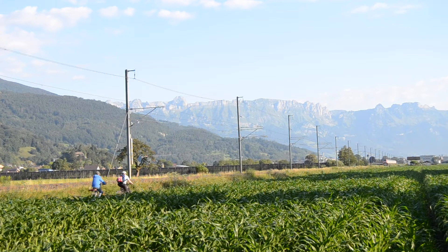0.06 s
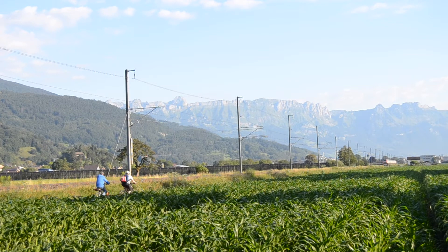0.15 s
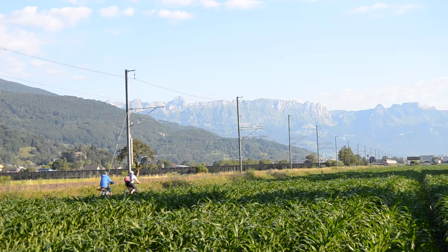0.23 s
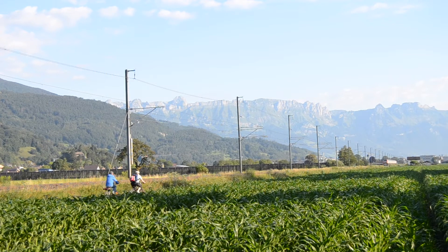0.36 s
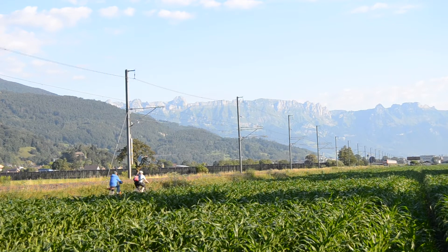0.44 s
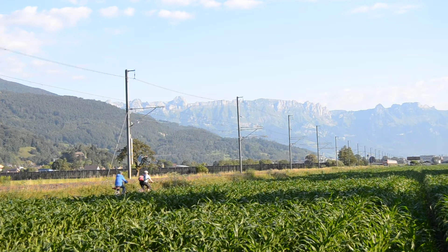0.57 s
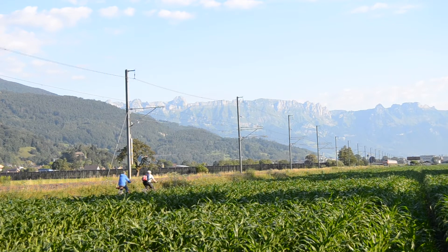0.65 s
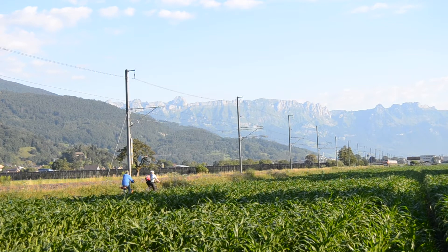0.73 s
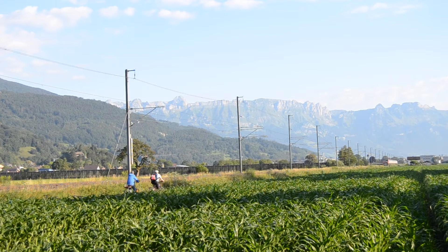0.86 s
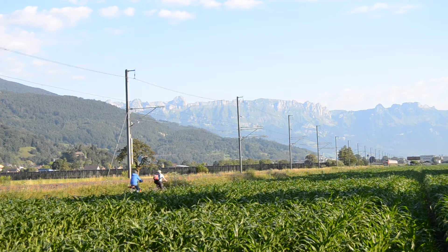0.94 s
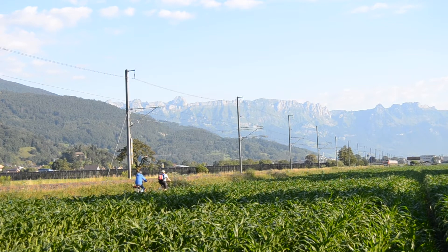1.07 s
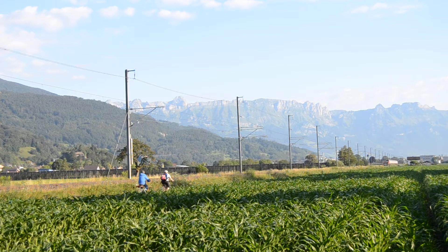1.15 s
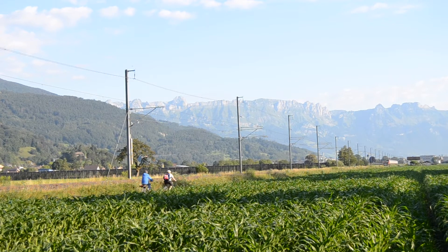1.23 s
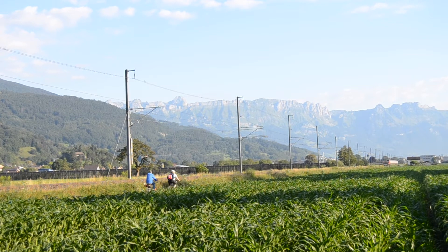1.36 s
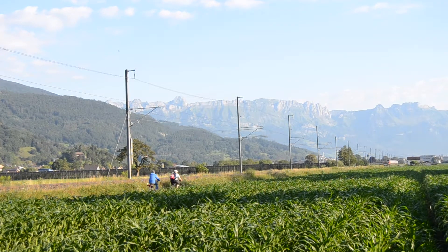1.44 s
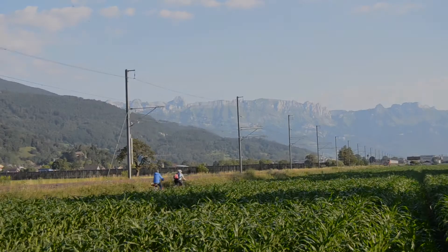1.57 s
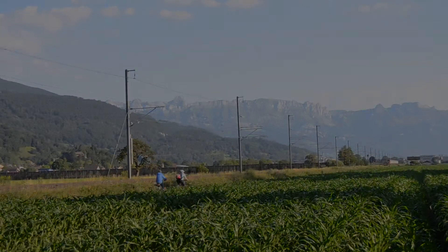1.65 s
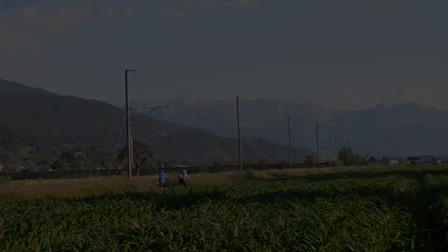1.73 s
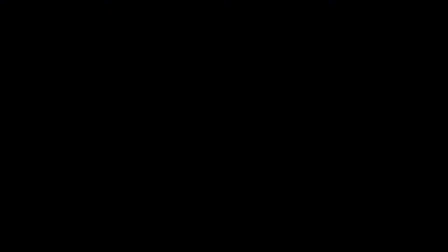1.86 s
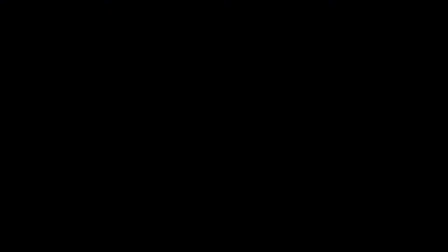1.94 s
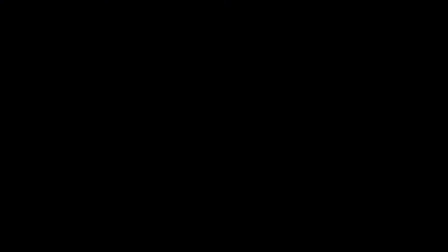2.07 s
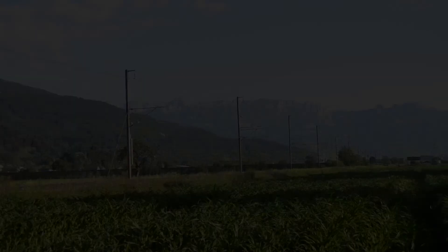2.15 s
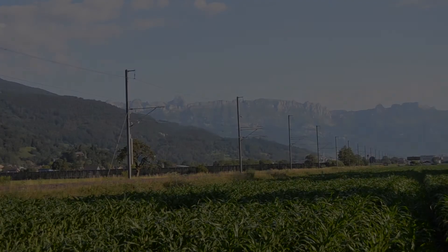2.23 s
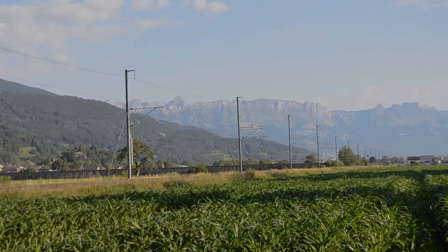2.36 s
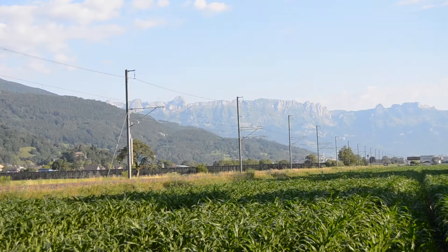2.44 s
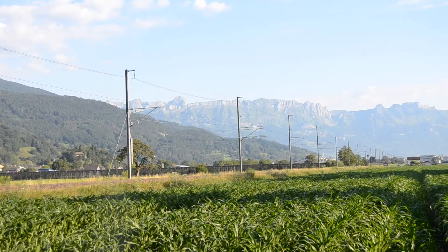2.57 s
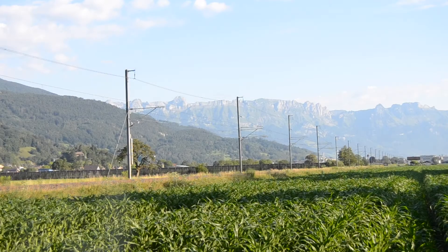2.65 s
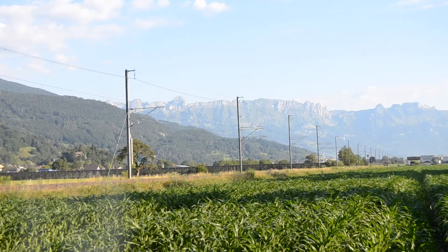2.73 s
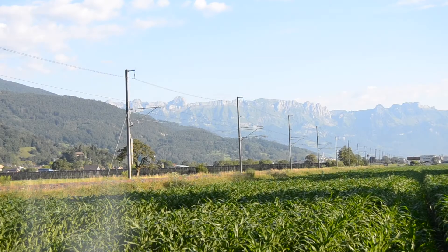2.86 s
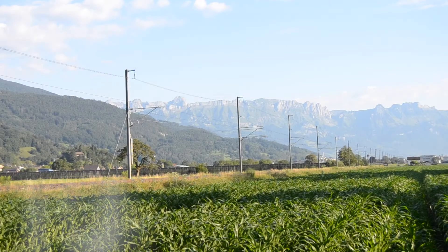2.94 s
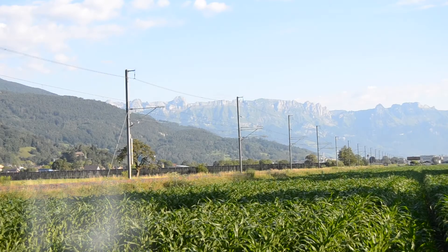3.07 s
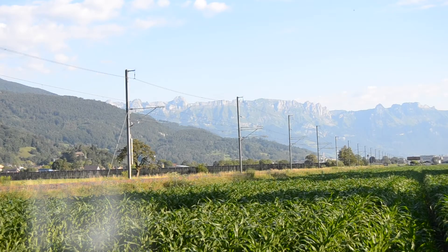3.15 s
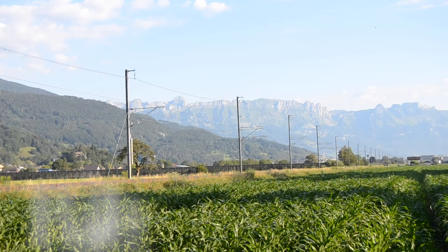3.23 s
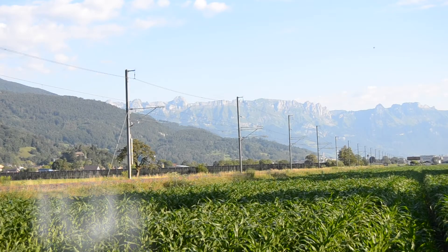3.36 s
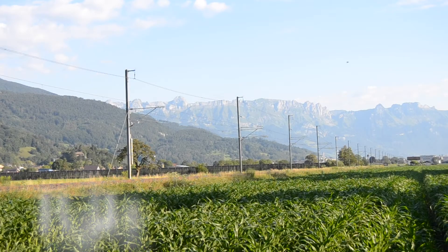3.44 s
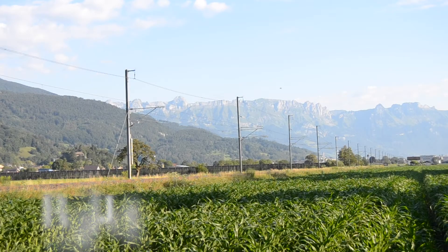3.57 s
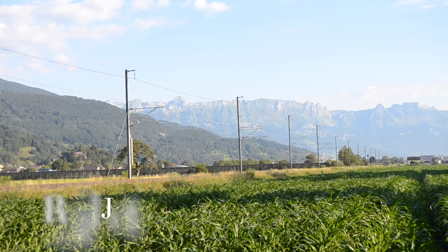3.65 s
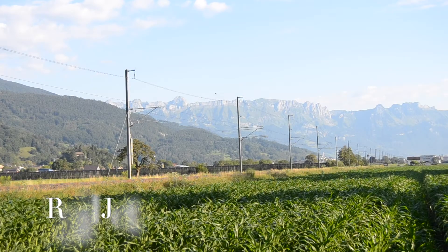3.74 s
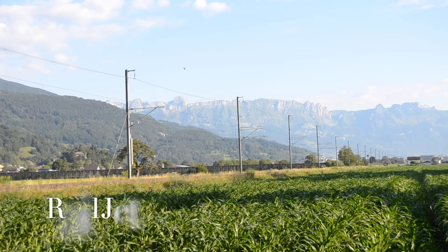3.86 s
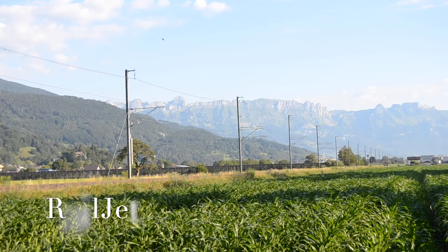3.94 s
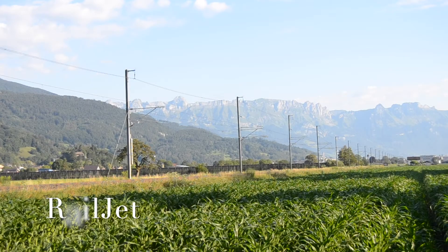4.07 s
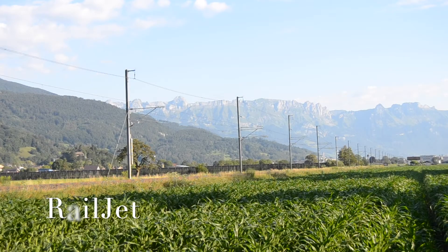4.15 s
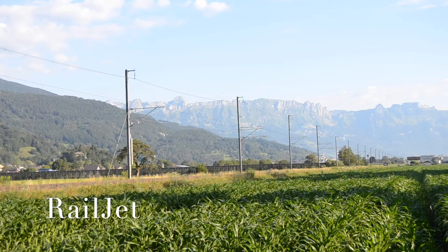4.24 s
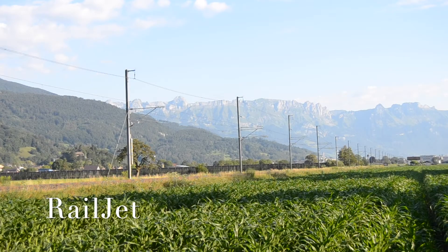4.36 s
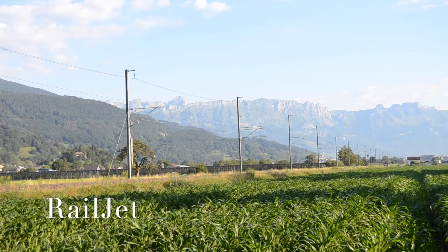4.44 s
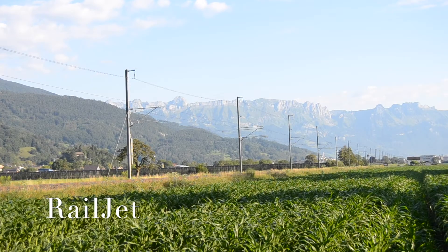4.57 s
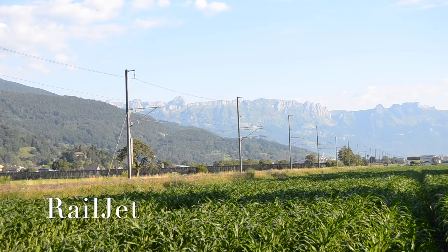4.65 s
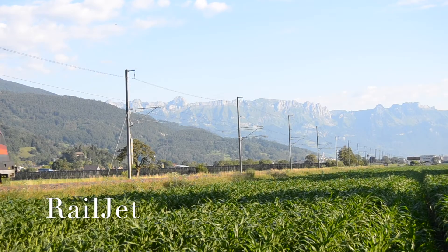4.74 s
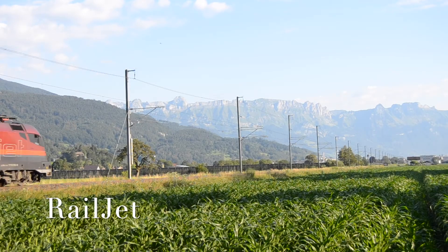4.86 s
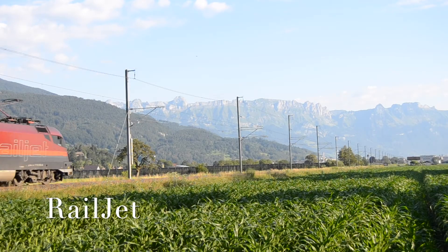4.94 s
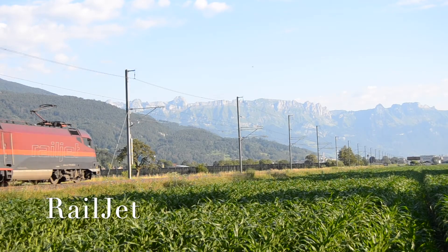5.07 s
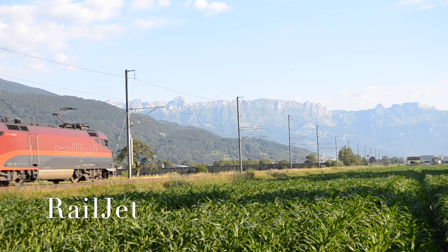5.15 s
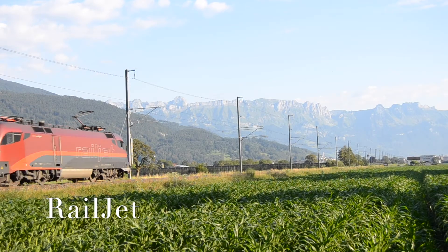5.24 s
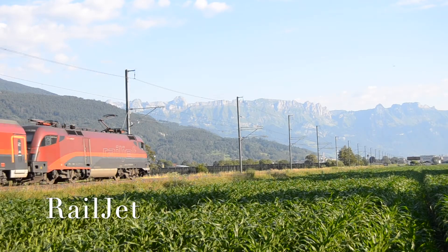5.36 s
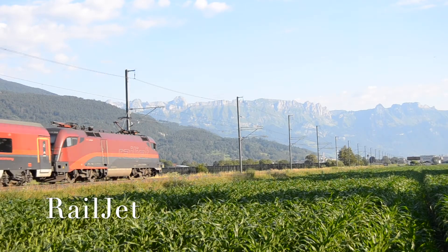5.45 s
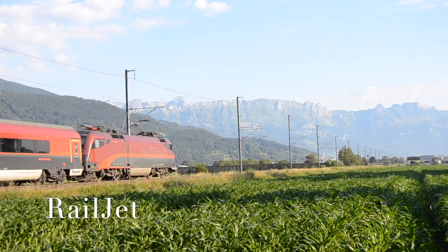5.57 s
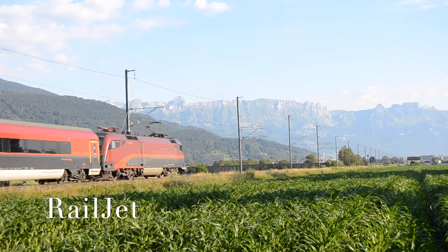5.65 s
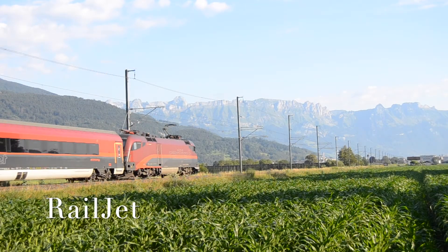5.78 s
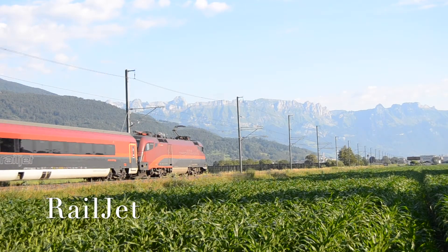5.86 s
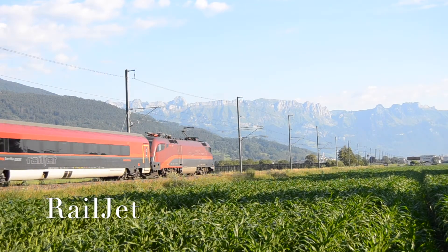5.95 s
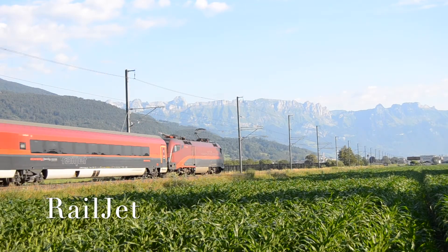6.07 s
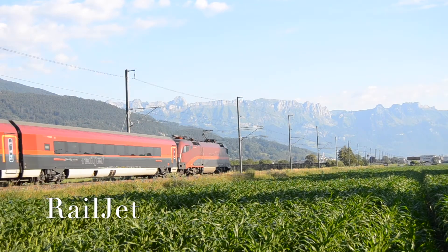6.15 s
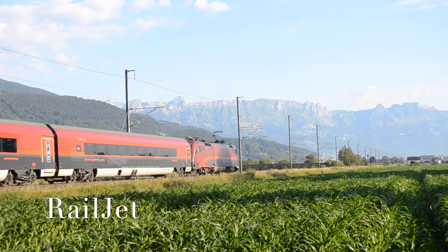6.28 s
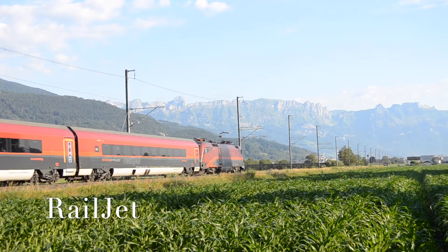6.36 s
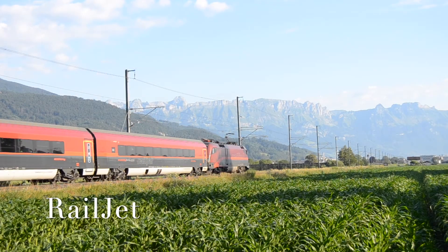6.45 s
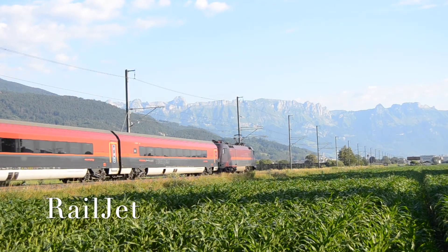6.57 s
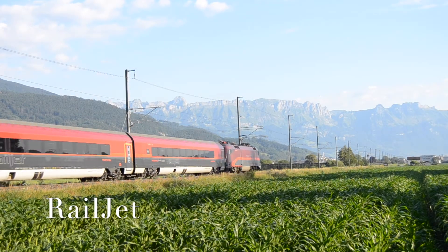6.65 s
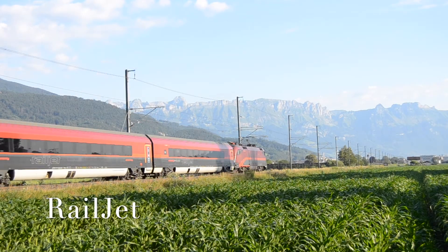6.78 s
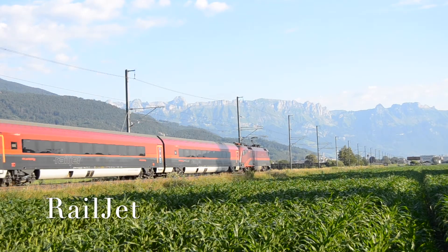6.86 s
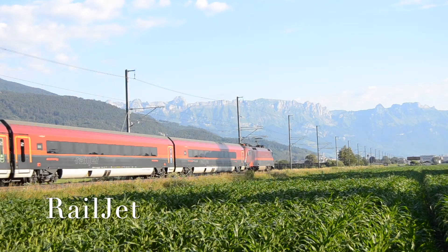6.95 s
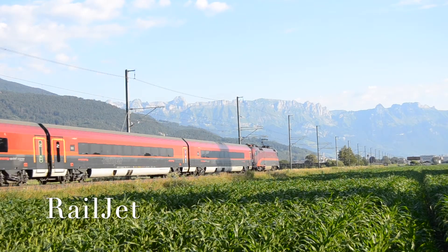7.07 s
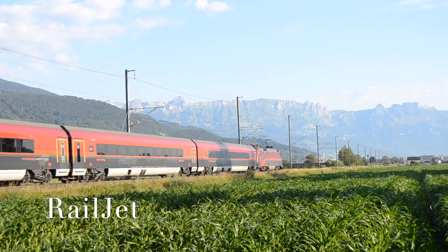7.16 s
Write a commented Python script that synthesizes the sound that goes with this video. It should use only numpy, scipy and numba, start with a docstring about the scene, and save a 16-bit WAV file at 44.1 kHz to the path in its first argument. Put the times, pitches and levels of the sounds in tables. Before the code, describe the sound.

Near silence outdoors with small close clicks, then a fast train swells from low rumble to loud bright rolling, whining rail note and sharp clanks.

```python
"""An electric passenger train sweeps past a quiet field, with a few dry ticks and a thin puff close by.
The locomotive rumbles first, then the coaches roll on: bands of noise that grow as the train comes near.
The rail sings one note under the axles, and each bogie's wheels ring with a pitch that falls as they go by.
The ticks are cracks of noise with ringing bodies; far traffic, wind and faint hums lie behind."""
import sys
import numpy as np
from scipy import signal
from scipy.fft import rfft, irfft, next_fast_len
from scipy.io import wavfile
from scipy.ndimage import uniform_filter1d
from numba import njit

SR = 44100
rng = np.random.default_rng(int(sys.argv[2]) if len(sys.argv) > 2 else 0)


def bounce(signal):
    """Save signal as a 16-bit WAV file at the path given by the first command-line argument."""
    frames = np.transpose(np.atleast_2d(signal))
    limited = np.clip(frames, -1, 1)
    pcm = np.round(limited * 32767).astype(np.int16)
    wavfile.write(sys.argv[1], SR, pcm)


N = 317961
T = np.arange(N) / SR  # time in seconds
M = next_fast_len(N + 4096)  # transform length, with room to spare at the end
F = np.maximum(np.arange(M // 2 + 1) * SR / M, 1)  # frequency of every bin in Hz

SPEED_M_S, TRACK_M = 33.1, 27.3  # train speed; distance from the listener to the track
RAIL_HZ = 2265  # note of the rail

# The joints between the vehicles as they pass, each with two axles before it and two after.
# Each row: time abreast in seconds, then the level in dB of the rail note under each of the four axles.
COUPLINGS = [(4.257, -44, -31, -24, -23), (5.085, -28, -23.5, -21, -36), (5.92, -25, -26, -37, -22.5),
             (6.725, -27.5, -30, -23, -22.5)]


def undb(db):
    """Turn decibels into a plain gain."""
    return 10 ** (np.asarray(db) / 20)


def level(x, db):
    """Scale a sound to an rms level in dB."""
    return x * undb(db) / np.sqrt(np.mean(x ** 2))


def shape(table):
    """Gain at every frequency, drawn between (Hz, dB) points."""
    hz, db = np.transpose(table)
    return undb(np.interp(np.log(F), np.log(hz), db))


@njit
def svf(x, hz, width):
    """State-variable band-pass filter: its centre can move, and its gain is 1 there."""
    y = np.empty(len(x))
    band, low = 0., 0.
    for i in range(len(x)):
        g = np.tan(np.pi * hz[i] / SR)
        k = width / hz[i]
        v = (band + g * (x[i] - low)) / (1 + g * (g + k))
        band = 2 * v - band
        low = low + 2 * g * v
        y[i] = k * v
    return y


def ring(hz, width_hz, size=N):
    """Noise through two equal resonances in a row, rms 1."""
    centre, width = hz * np.ones(size), 1. * width_hz
    once = svf(rng.standard_normal(size), centre, width)
    return level(svf(once, centre, width), 0)


def walk(rate):
    """A random wander: new levels `rate` times a second, smoothed twice, with a spread near 1."""
    hold = int(SR / rate)
    steps = np.repeat(rng.standard_normal(N // hold + 1), hold)
    smooth = uniform_filter1d(uniform_filter1d(steps, hold), hold)
    return 1.72 * smooth[:N]


def rush(spectrum, flicker_db, rate):
    """Coloured noise whose half-octave bands flicker each on their own, rms 1."""
    noise = rfft(rng.standard_normal(M)) * shape(spectrum)
    pitch = np.log2(np.clip(F, 32, 11585))  # in octaves above 1 Hz
    out = 0
    for octave in np.arange(5, 14, .5):
        if spectrum[0][0] < 2 ** octave < spectrum[-1][0]:
            share = np.clip(1 - 2 * abs(pitch - octave), 0, 1)  # overlapping triangles
            band = irfft(noise * share, M)[:N]
            out = out + band * undb(flicker_db * walk(rate))
    return level(out, 0)


def passing(abreast_s, loco_db, loss_db_per_m, coach_db, swell_db, fade_power):
    """Gain of a layer: a point locomotive fades over the crop; a row of coaches sounds sideways and builds up."""
    distance = np.hypot(SPEED_M_S * (T - abreast_s), TRACK_M)
    loco = undb(loco_db - loss_db_per_m * (distance - TRACK_M)) * TRACK_M / distance

    first_coach_s, coach_beam = 3.945, 2.8  # a larger beam number is narrower
    since = T - first_coach_s
    angle = np.arctan(SPEED_M_S * since / TRACK_M)
    sideways = np.exp(-(coach_beam * angle) ** 2) / (1 + since ** 2) ** 2
    built_up = np.cumsum(sideways) / sideways.sum()

    swell_lag_s, swell_s = 0.14, 0.16
    swell = sum(np.exp(-((T - s - swell_lag_s) / swell_s) ** 2) for s, *_ in COUPLINGS)
    coach_power = undb(coach_db + swell_db * swell) ** 2 * built_up

    fade_start_s, fade_time_s = 1.75, 0.19
    fade_in = 1 - np.exp(-np.maximum(T - fade_start_s, 0) / fade_time_s)
    return np.sqrt(loco ** 2 + coach_power) * fade_in ** fade_power


def train():
    """The locomotive roars first, then wheels roll on rough rail; a thin top of hiss grows with the coaches."""
    # Colour of each noise layer. Each row: frequency in Hz, relative level in dB per Hz.
    roar = [(140, -35), (190, -15), (260, -9), (380, -0.5), (560, -2.5), (800, 0), (1150, -2), (1560, -5),
            (2400, -12.5), (3800, -16.5), (6000, -43)]
    thunder = [(20, -23), (45, -13), (90, -3), (130, -3), (200, -6.5), (400, -25.5)]
    roll = [(120, -31.5), (200, -19), (400, -18), (620, -11.5), (780, -1.5), (880, -6), (1100, -4.5),
            (1330, -7), (1450, -0.5), (1680, -1), (1775, -1), (1970, -5.5), (2200, -10.5), (2420, -4.5),
            (2600, -28), (4000, -40)]
    hiss = [(1500, -16), (2500, -2), (3300, -1.5), (4000, -3), (4800, -6), (5600, -20), (7000, -34)]
    top = [(4000, -29), (5200, 0.5), (7000, -1), (10000, -5.5), (14000, -22.5)]
    # How each layer passes. Each row: time the locomotive is abreast in seconds, locomotive level in dB,
    # loss over the crop in dB per m, coach level in dB, swell at the couplings in dB,
    # lateness of the fade-in as a power.
    roar_pass = (4, -32.5, 0.14, -44, 4, 1.2)
    thunder_pass = (4, -48.5, 0.35, -57.5, 2.5, 0.7)
    roll_pass = (3.5, -35, 0.26, -27, 0.9, 11)
    hiss_pass = (4, -42, .21, -34, 0.4, 8)
    top_pass = (4, -54, 0.03, -43, 1.5, 2)

    out = passing(*roar_pass) * rush(roar, flicker_db=1.33, rate=7)
    out += passing(*thunder_pass) * rush(thunder, flicker_db=1.9, rate=5)
    out += passing(*roll_pass) * rush(roll, flicker_db=1.0, rate=12)
    out += passing(*hiss_pass) * rush(hiss, flicker_db=0.27, rate=14)
    out += passing(*top_pass) * rush(top, flicker_db=0.3, rate=16)
    return out


def rail():
    """One note of the rail that wavers a little, sounded by each axle."""
    waver_hz = 3.65
    phase = 2 * np.pi * np.cumsum(RAIL_HZ + waver_hz * walk(30)) / SR
    inner_axle_s, outer_axle_s, note_s = 0.074, .17, 0.039  # axle times from the coupling; note length
    axles = (-outer_axle_s, -inner_axle_s, inner_axle_s, outer_axle_s)
    load = np.zeros(N)
    for s, *levels_db in COUPLINGS:
        for lag, db in zip(axles, levels_db):
            load += undb(db) * np.exp(-((T - s - lag) / note_s) ** 2)
    return load * undb(1.2 * walk(60)) * np.sin(phase)


def wheels():
    """Wheel discs ring sideways in a beam that narrows with pitch; the note flutters and drops in passing."""
    # Wheel sets going by. Each row: time abreast in seconds, low ring level in dB, high ring level in dB.
    bogies = [(4.55, -34.5, -51), (4.75, -36.5, -55), (5.15, -36.5, -50), (5.36, -30, -43), (5.5, -34, -52),
              (5.8, -34, -51), (6.1, -30.5, -40.5), (6.24, -30.5, -44.5), (6.38, -32.5, -51),
              (6.65, -36, -55), (6.92, -33.5, -41.5), (7.02, -29.5, -46)]
    # Ringing notes of a wheel. Each row: frequency in Hz, width of the resonance in Hz, relative level in dB.
    wheel_low = [(2182.6, 62, -1)]
    wheel_high = [(2672, 30, -2), (3250, 30, -5.5), (3965, 21, -0.5), (4600, 50, -7)]
    beam_narrowness, sound_m_s = 2.9, 343

    out = np.zeros(N)
    for s, low_db, high_db in bogies:
        near = slice(int((s - .8) * SR), min(N, int((s + .8) * SR)))
        angle = np.arctan(SPEED_M_S * (T[near] - s) / TRACK_M)
        doppler = 1 / (1 + SPEED_M_S * np.sin(angle) / sound_m_s)
        for modes, db in ((wheel_low, low_db), (wheel_high, high_db)):
            for hz, width_hz, mode_db in modes:
                narrowness = beam_narrowness * (hz / RAIL_HZ) ** 0.56
                beam = np.exp(-(narrowness * angle) ** 2 / 2)
                gain = undb(db + mode_db + 1.2 * rng.standard_normal())
                out[near] += beam * gain * ring(hz * doppler, width_hz, size=len(beam))
    return out * undb(1.3 * walk(25))


def clanks():
    """Brief swells of a single note in the roar of the coaches."""
    # Short notes. Each row: time of the peak in seconds, level in dB, pitch in Hz,
    # time in seconds from the peak to about a third of it.
    notes = [(4.28, -47, 4900, .05), (4.432, -20.5, 1386, 0.011), (5.06, -34.5, 4900, 0.021),
             (5.2, -26, 1770, 0.032), (5.826, -20.5, 1780, 0.012), (5.88, -40, 4840, 0.035),
             (5.992, -13.5, 1776, 0.0075), (6.19, -32, 2650, 0.023)]
    out = np.zeros(N)
    for s, db, hz, length in notes:
        swell = np.exp(-((T - s) / length) ** 2)
        out += undb(db) * swell * np.sin(2 * np.pi * hz * T)
    return out


def ticks():
    """A crack of noise, and a small hard body whose modes near the crack's pitch ring most."""
    # Dry ticks. Each row: start in seconds, level in dB, pitch in Hz, time in seconds for the main part
    # of the crack to fall 60 dB, share of ringing from 0 to 1.
    hits = [(0.372, -46, 3280, 0.035, 0.4), (.451, -58, 5000, .06, .6), (0.761, -36, 2980, 0.045, 0.43),
            (0.785, -47, 2600, 0.056, 0.2), (0.891, -35, 3800, .03, 0.54),
            (1.113, -43.5, 4500, 0.049, 0.33), (1.124, -44, 2600, 0.037, .3),
            (1.141, -46.5, 2800, 0.043, 0.6), (1.319, -60, 3500, .06, .3), (1.3565, -55, 5000, 0.034, 0.5),
            (1.673, -47, 1050, .03, 0.6), (1.754, -36.5, 950, 0.049, 0.43)]
    # Ringing notes of the body. Each row: typical frequency in Hz, typical relative level in dB,
    # time to fall 60 dB in seconds.
    tick_modes = [(720, 1, 0.054), (970, 0, 0.041), (1410, -11, .04), (1770, -4, .04), (2290, -5.5, .05),
                  (3510, 1.5, 0.021), (4350, -2, 0.043), (7030, -1, .04), (8600, -3, .025)]

    out, t = np.zeros(N), T[:SR // 8]
    attack = 1 - np.exp(-t / 0.00029)
    for s, db, hz, t60, share in hits:
        body = np.zeros(len(t))
        for mode_hz, mode_db, decay in tick_modes:
            level_chance, pitch_chance = rng.standard_normal(2)
            off_pitch_db = 7.9 * abs(np.log2(mode_hz / hz))
            gain = undb(mode_db + 2.0 * level_chance - off_pitch_db)
            tone = np.sin(2 * np.pi * mode_hz * (1 + 0.006 * pitch_chance) * t)
            body += gain * tone * 1000 ** (-t / decay)
        crack = level(svf(rng.standard_normal(len(t)), hz + 0 * t, 0.82 * hz + 450), 0)
        crack *= 1000 ** (-t / t60) + 0.18 * 1000 ** (-t / 0.28)  # quick fall with a weaker, slower tail
        start = int(s * SR)
        out[start:start + len(t)] += undb(db) * ((1 - share) * crack + 1.62 * share * body) * attack
    return out


def puff():
    """A thin hiss in two strokes: each swells quickly and dies away."""
    # The two strokes. Each row: start in seconds, level in dB.
    stroke_table = [(2.293, -40), (2.39, -52)]
    # Colour of the hiss. Each row: frequency in Hz, width of the resonance in Hz, relative level in dB.
    colour = [(5900, 700, -9), (7200, 1100, -1), (8100, 1300, -2), (9400, 1300, -5), (10700, 1000, -7)]
    attack_s, t60_s = 0.017, 0.38

    strokes = np.zeros(N)
    for s, db in stroke_table:
        since = np.maximum(T - s, 0)
        rise = (1 - np.exp(-since / attack_s)) ** 1.4
        strokes += undb(db) * rise * 1000 ** (-since / t60_s)
    hiss = sum(undb(db) * ring(hz, width_hz) for hz, width_hz, db in colour)
    return strokes * level(hiss, 0)


def field():
    """Distant traffic and wind in the crop as coloured noise, with faint hums that die away."""
    # Colour of the background. Each row: frequency in Hz, relative level in dB per Hz.
    spectrum = [(20, -35), (40, -13), (170, -12), (230, -2.5), (620, -2.5), (885, 0.5), (1150, -3.5),
                (1330, -1.5), (2100, -11), (7000, -21.5), (14000, -23)]
    # Hums of far machines. Each row: pitch in Hz, typical level in dB, time of silence in seconds.
    hum_table = [(64.6, -75, 1.05), (231, -79, 1.8)]
    hums = np.zeros(N)
    for hz, db, end in hum_table:
        fade_out = np.clip((end - T) / .15, 0, 1)
        hums += undb(db + 0.98 * walk(6)) * np.sin(2 * np.pi * hz * T) * fade_out
    noise_db = -59.5
    return undb(noise_db) * rush(spectrum, flicker_db=0.6, rate=7.0) + hums


def scene():
    """All sources added together as one channel."""
    return (train() + rail() + wheels() + clanks() + ticks() + puff() + field())[None]


def record(dry):
    """The microphone has a notch and a bump in its treble; a steep filter cuts what lies above."""
    # Response of the microphone. Each row: frequency in Hz, gain in dB.
    mic = [(20, -21), (50, 2), (7400, -0.5), (7950, -6.5), (8500, -0.5), (9600, 2.5), (10400, -3.5),
           (11000, -20), (12000, -44)]
    top_hz = 11220
    coloured = irfft(rfft(dry, M) * shape(mic), M)[:, :N]
    low_pass = signal.ellip(10, .2, 80, top_hz, fs=SR, output="sos")  # 0.2 dB ripple, 80 dB cut
    return signal.sosfilt(low_pass, coloured)


dry = scene()
out = record(dry)
bounce(out)
```